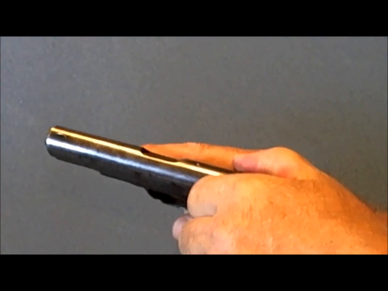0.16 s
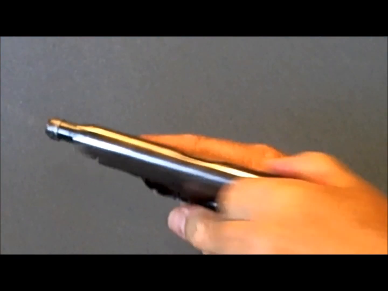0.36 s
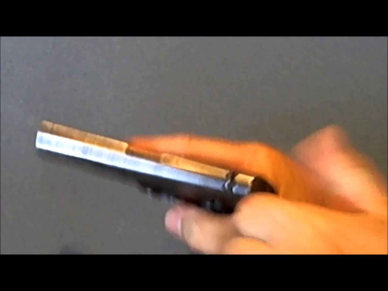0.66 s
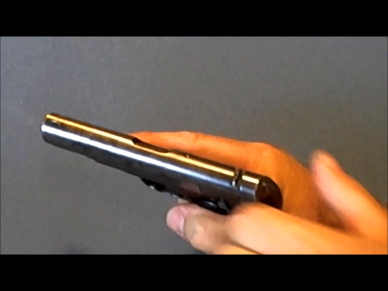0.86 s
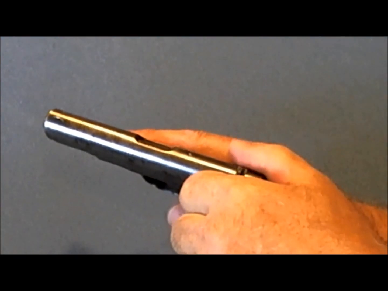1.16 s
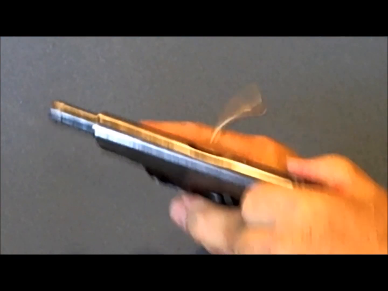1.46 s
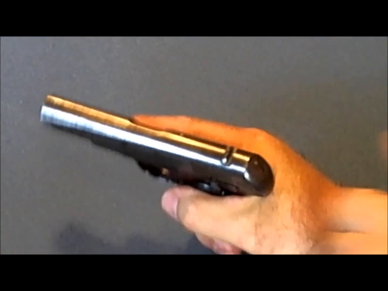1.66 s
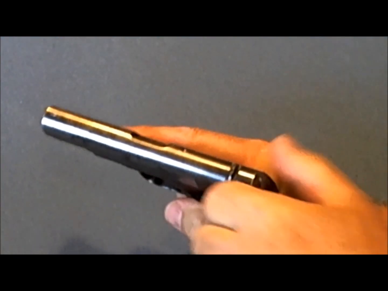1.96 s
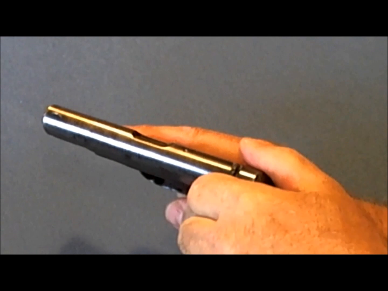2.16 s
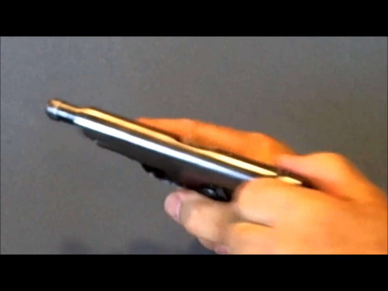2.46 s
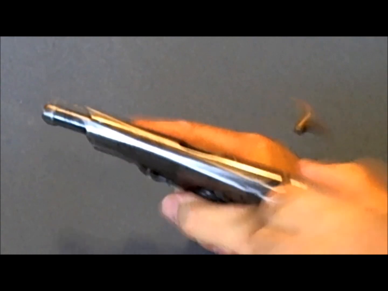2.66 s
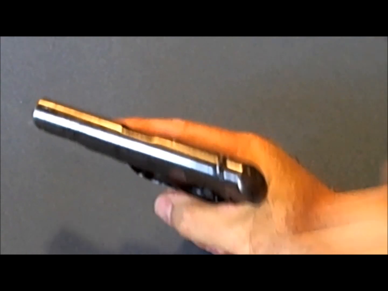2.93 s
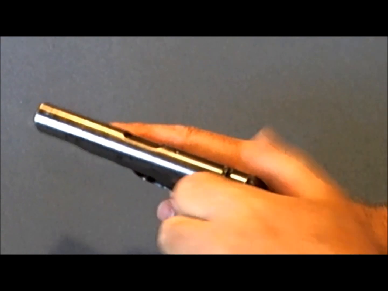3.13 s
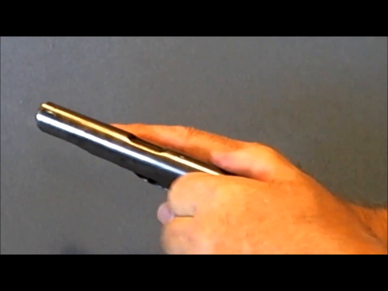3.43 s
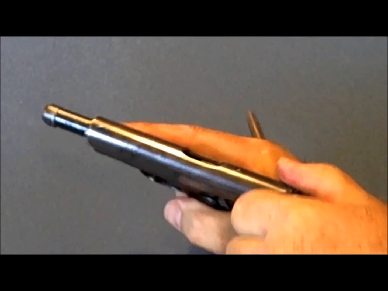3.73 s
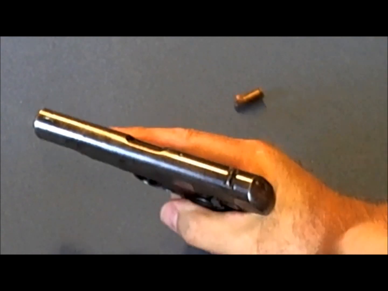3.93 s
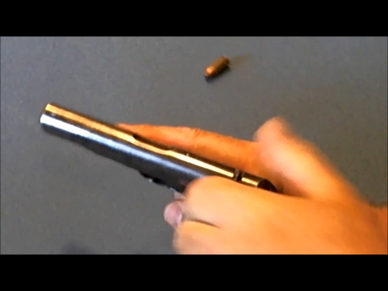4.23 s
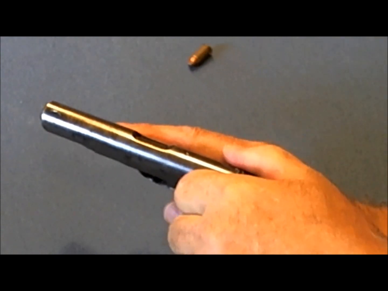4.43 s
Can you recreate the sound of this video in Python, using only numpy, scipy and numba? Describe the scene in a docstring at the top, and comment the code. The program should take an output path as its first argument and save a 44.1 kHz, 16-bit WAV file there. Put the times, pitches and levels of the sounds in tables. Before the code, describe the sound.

Very close to the microphone in a small, hard room, a pistol slide is racked four times about a second apart. Each time it scrapes and clicks backward, clacks on its stop with a thin spring ping, then runs forward and slams shut with a loud, bright steel crack and rattle. Dull cartridge knocks on the table follow the second and third cycles. Low rumble and faint hum lie underneath.

```python
"""A pistol slide is racked four times over a table in a small, hard room, close to a microphone.
First the action ticks as the grip tightens. In each racking the slide scrapes back as rail friction noise, clacks on
its stop and throws out a cartridge, while the spring pings; it then runs forward and shuts with a cluster of blows.
Impacts are noise bursts with decaying steel modes. Cartridges knock on the table after the second and third rackings.
Diffuse echoes prolong every blow, gain control slowly eases the level down, and rumble and hum persist throughout."""
import sys
import numpy as np
from scipy import signal
from scipy.fft import rfft, irfft, next_fast_len
from scipy.io import wavfile
from scipy.ndimage import uniform_filter1d
from numba import njit

SR = 44100
rng = np.random.default_rng(int(sys.argv[2]) if len(sys.argv) > 2 else 0)


def wav_out(sig):
    """Save sig, one row per channel (or a flat mono array), as 16-bit PCM at SR to the path in sys.argv[1]."""
    wavfile.write(sys.argv[1], SR, np.round(np.clip(np.atleast_2d(sig).T, -1, 1) * 32767).astype(np.int16))


N = 202419
TIME = np.arange(N) / SR


# Forward strokes of the slide; levels are relative: (release time [s], full-speed rub level [dB],
# feed time [s], feed level [dB], slam time [s], slam level [dB], rattle time [s], rattle level [dB])
RETURNS = [(1.229, -23.5, 1.308, -11, 1.285, 1.5, 1.318, 1.5),
           (2.245, -22, 2.2763, -6.5, 2.290, 5, 2.326, 2.5), (3.313, -22, 3.348, -8, 3.362, 0, 3.406, 0.5),
           (4.476, -26.5, 4.5128, -8.5, 4.534, 1.5, 4.568, -3)]
# Jolts of the gun in the hands as it shuts: (time [s], relative knock level [dB],
# relative push pressure [1], relative sway pressure [1], sway frequency [Hz])
JOLTS = [(1.288, -8, 0.19, .11, 6.5), (2.299, -7, 0.036, 0.052, 8.2), (3.372, -3.5, 0.24, 0.13, 4.67),
         (4.540, -11, -0.084, 0.098, 8.8)]
SPEED_POWER = 1.35  # growth of the rub with the time since release


def run_home(feed_weight_db=1.5, slam_weight_db=-3.0, rattle_weight_db=-11, knock_weight_db=9):
    """Friction, then impact: the slide runs forward and shuts with feed, slam, knock and rattle close together."""
    effort = np.zeros(N)
    feeds, slams, rattles = [], [], []
    for release_s, rub_db, feed_s, feed_db, slam_s, slam_db, rattle_s, rattle_db in RETURNS:
        speed = np.clip((TIME - release_s) / (slam_s - release_s), 0, 1) * (TIME < slam_s)
        effort += undb(rub_db) * speed ** SPEED_POWER
        feeds.append((feed_s, feed_db, feed_weight_db))
        slams.append((slam_s, slam_db, slam_weight_db))
        rattles.append((rattle_s, rattle_db, rattle_weight_db))
    knocks = [(s, db, knock_weight_db) for s, db, *_ in JOLTS]
    rub = undb(-1.0) * scrape(effort, grain_db=3.0, judder_db=0.2, hiss_db=-1.9, hiss_from_db=-52.0)
    feed_and_slam = shut_blows(feeds, t60=0.035) + shut_blows(slams, t60=0.049)
    knock_and_rattle = shut_blows(knocks, t60=0.011) + shut_blows(rattles, t60=0.083)
    return rub + feed_and_slam + knock_and_rattle


# Spectrum of blows on the closed gun: (frequency [Hz], relative level [dB])
SHUT_COLOUR = [(70, -15.5), (190, -3.5), (460, -5.5), (1150, -7), (2000, -6.5), (4000, -5.5), (5150, 0),
               (6400, -4), (7200, -3.5), (9500, -3.5), (9900, -15.5), (11800, -16.5), (12400, -12.5),
               (15000, -21)]
# Steel modes of the closed gun: (frequency [Hz], relative level [dB], t60 before hand damping [s])
SHUT_MODES = [(1400, -12.5, 0.12), (1734, -11.5, 0.54), (2650, -9, 0.13), (3050, -1.5, 0.11),
              (4650, -9, 0.12), (4600, -6, 0.19), (4930, -11, 0.24), (5025, 0, 0.12), (5440, -5.5, 0.26),
              (5230, -4.5, 0.29), (5400, 0, 0.24), (5260, -11, 0.82), (5530, -6.5, 0.58),
              (6200, -2.5, 0.14), (7130, 2, 0.23), (7170, 4, .25), (7650, 2.5, 0.34), (7100, -3, 0.18),
              (7800, -9.5, 0.17), (9500, -6, .08), (9650, -0.5, .1)]


def shut_blows(events, t60):
    """Modal excitation: a blow on the closed gun rings its modes."""
    struck = blows(events, SHUT_COLOUR, SHUT_MODES, weight_hz=1210, t60=t60, ring_db=-7.5, detune=0.0012)
    return undb(10) * struck


# Backward strokes of the slide; levels are relative: (pull start time [s], rear stop time [s],
# slow rub level [dB], full-speed rub level [dB], stop blow level [dB], ejection time [s], ejection level [dB])
DRAWS = [(0.921, 1.0753, -50.5, -33, -6.5, 1.093, -6), (1.933, 2.1407, -48, -28, -4, 2.173, -16),
         (3.022, 3.194, -49.5, -31.5, -10.5, 3.216, -14.5), (4.10, 4.283, -46, -28, -9.5, 4.2995, -8.5)]
# Small steel parts and cartridge rims that catch and click:
# (time [s], relative level [dB], low-end weight [dB])
CATCHES = [(.840, -49, 25.5), (.9372, -26.5, -6), (.967, -30.5, 6.5), (1.0152, -23.5, 4.5),
           (1.2386, -19.5, -4.5), (1.9715, -24, 8), (2.055, -30, -9.5), (2.0953, -23, 6.5), (3.049, -29, 2),
           (3.0695, -28.5, -9), (3.0925, -27, -3), (3.1485, -25, 6), (3.508, -20, 0), (4.1272, -28.5, 14),
           (4.193, -28, -3), (4.230, -17.5, -12), (4.2625, -17, 8)]
TAKE_UP_S = 0.02  # the hand takes up the load
RUSH_S, STALL_S = .022, 0.018  # time constants of speeding up towards the stop and of stalling on it
BOUNCE_S, BOUNCE_DB = .007, -6.5  # the cartridge glances off the port as it leaves


def draw_back(stop_weight_db=5.0, eject_weight_db=-11):
    """Friction, then impact: the slide creeps against its spring, rushes to its stop and ejects a cartridge."""
    effort = np.zeros(N)
    stops, ejections = [], []
    for pull_s, stop_s, creep_db, rush_db, stop_db, eject_s, eject_db in DRAWS:
        take_up = np.clip((TIME - pull_s) / TAKE_UP_S, 0, 1)
        speed = np.exp(np.minimum(TIME - stop_s, 0) / RUSH_S)
        stall = np.exp(-np.maximum(TIME - stop_s, 0) / STALL_S)
        effort += take_up * (undb(creep_db) + undb(rush_db) * speed) * stall
        stops.append((stop_s, stop_db, stop_weight_db))
        ejections.append((eject_s, eject_db, eject_weight_db))
        ejections.append((eject_s + BOUNCE_S, eject_db + BOUNCE_DB, eject_weight_db))
    rub = undb(-3.0) * scrape(effort, grain_db=2.5, judder_db=2.0, hiss_db=1.5, hiss_from_db=-39.5)
    clicks = open_blows(CATCHES, t60=.014) + undb(10.5) * small_catches()
    return rub + clicks + open_blows(stops, t60=0.031) + open_blows(ejections, t60=.012)


# Spectrum of blows on the open gun: (frequency [Hz], relative level [dB])
OPEN_COLOUR = [(90, -27), (200, -17.5), (700, -14.5), (920, -6.5), (1180, -13.5), (1620, -8), (1950, -13),
               (3000, -5), (3400, -4.5), (5200, -3), (6300, -5.5), (9000, -7.5), (10200, -17), (15000, -28)]
# Steel modes of the open gun: (frequency [Hz], relative level [dB], t60 before hand damping [s])
OPEN_MODES = [(915, -10.5, 0.11), (1600, -7.5, 0.23), (2983, 5, 0.058), (3970, -8, .04), (5000, -6, .05),
              (5480, -2, 0.079), (6820, 1.5, 0.11), (7230, 1, .08), (8770, -5, 0.038)]


def open_blows(events, t60):
    """Modal excitation: with the slide open the gun answers a blow with a different set of modes."""
    struck = blows(events, OPEN_COLOUR, OPEN_MODES, weight_hz=1400, t60=t60, ring_db=-14.5, detune=0.0019)
    return undb(11.0) * struck


TICKS_PER_S, TICK_DB, TICK_SCATTER_DB = 30, -34.5, 2  # mean rate, relative level and its deviation


def small_catches(count=8):
    """Stick-slip: faint ticks at loose intervals throughout each pull."""
    ticks = []
    for pull_s, stop_s, *_ in DRAWS:
        times = pull_s + (np.arange(count) + rng.random(count)) / TICKS_PER_S
        sizes = TICK_DB + TICK_SCATTER_DB * rng.standard_normal(count)
        ticks += [(s, db) for s, db in zip(times, sizes) if s < stop_s]
    return taps(ticks, OPEN_COLOUR, t60=0.01)


# Pings of the recoil spring: (time [s], relative level [dB])
PINGS = [(1.0563, -24), (1.122, -19.5), (2.158, -25), (3.114, -33), (4.264, -22.5), (4.309, -17.5)]
# Modes of the spring: (frequency [Hz], relative level [dB], t60 before hand damping [s])
PING_MODES = [(7110, -6, 0.037), (6950, -2.5, .04), (7090, 1.5, 0.066), (7740, -2, 0.039),
              (7300, -6.5, .025)]


def spring():
    """Free vibration: the recoil spring's coils slip on their guide and ping."""
    out = np.zeros(N)
    for s, db in PINGS:
        add(out, s, undb(db) * ring(PING_MODES, TIME[:SR // 4], detune=0.0067))
    return out


# Cartridges landing on the table: (time [s], relative level [dB], relative level of the first hop [dB])
KNOCKS = [(2.385, -21, -39), (2.533, -26, -37), (3.565, -29.5, -46.5)]
# Spectrum of a knock on the table: (frequency [Hz], relative level [dB])
TABLE_COLOUR = [(80, -12.5), (250, -1), (450, -1), (650, -5), (900, -6.5), (2000, -28), (8000, -40)]
HOP_S, HOP_SHRINK, HOP_LOSS_DB = 0.042, .8, -2.5  # first interval, then each hop is shorter and softer


def cartridges(count=3):
    """Inelastic rebound: a cartridge lands with a dull knock and loses energy at each hop."""
    hits = []
    for s, db, hop_db in KNOCKS:
        hits.append((s, db))
        for k in range(count):
            s = s + HOP_S * HOP_SHRINK ** k
            hits.append((s, hop_db + k * HOP_LOSS_DB))
    return taps(hits, TABLE_COLOUR, t60=0.031)


# Tiny ticks as the hand settles on the slide: (time [s], relative level [dB])
GRIP_TICKS = [(.4645, -48.5), (.4812, -46.5), (.492, -53)]
# Spectrum of a grip tick: (frequency [Hz], relative level [dB])
GRIP_COLOUR = [(500, -23), (3000, -16), (4300, -4), (6200, 1), (7600, -9), (9500, -8.5), (11000, -22),
               (15000, -26)]


def grip_ticks():
    """Damped contact: the action ticks, without ringing, as the grip tightens."""
    return undb(17.0) * taps(GRIP_TICKS, GRIP_COLOUR, t60=0.0077)


PUSH_S = .004  # time to the peak of the push
SWAY_LAG_S, SWAY_DECAY_S = 0.013, 0.071  # the sway starts later and decays with this time constant


def thumps(corner_hz):
    """Damped oscillation: each jolt is a short push of pressure, then the hands sway back and settle."""
    out, t = np.zeros(N), TIME[:SR // 2]
    for s, _, push, sway, sway_hz in JOLTS:
        add(out, s, push * (t / PUSH_S * np.exp(1 - t / PUSH_S)) ** 2)
        add(out, s + SWAY_LAG_S, -sway * np.sin(2 * np.pi * sway_hz * t) * np.exp(-t / SWAY_DECAY_S))
    return signal.sosfilt(signal.butter(1, corner_hz, "high", fs=SR, output="sos"), out)


# Spectrum of the rubbing rails: (frequency [Hz], relative level [dB])
RAIL_COLOUR = [(200, -13.5), (900, -5.5), (2000, -4.5), (3200, -3), (6000, -1.5), (7200, -2.5), (9000, -6),
               (11000, -11.5), (15000, -21)]
# Spectrum of the hiss of a fast stroke: (frequency [Hz], relative level [dB])
HISS_COLOUR = [(200, -46.5), (6000, -16), (9500, -2.5), (11500, 1.5), (13000, -1), (15000, -3)]


def scrape(effort, grain_db, judder_db, hiss_db, hiss_from_db, judder_s=0.0036):
    """Friction noise: dense catches of uneven size come in fits; a fast stroke is louder and adds a hiss."""
    effort = uniform_filter1d(effort, size=256)
    wander = np.interp(TIME / judder_s, np.arange(N), rng.standard_normal(N))
    judder = undb(judder_db * wander)
    present = rng.random(N) < .15
    sizes = undb(grain_db * np.minimum(rng.exponential(size=N), 4))
    catches = judder * rng.standard_normal(N) * present * sizes
    fast = effort ** 2 / (effort ** 2 + undb(hiss_from_db) ** 2)
    hiss = level(colour(judder * rng.standard_normal(N), HISS_COLOUR), hiss_db)
    return effort * (level(colour(catches, RAIL_COLOUR), 0) + fast * hiss)


def blows(events, spectrum, modes, weight_hz, t60, ring_db, detune):
    """Impact of steel on steel: a broad crack, its bass weighted by the frame's share, and the modal ring."""
    out, t = np.zeros(N), TIME[:SR // 2]
    for s, db, weight_db in events:
        crack = colour(chatter(t, t60), spectrum)
        bass = signal.sosfilt(signal.butter(1, weight_hz, fs=SR, output="sos"), crack)
        weighted = crack + (undb(weight_db) - 1) * bass
        add(out, s, undb(db) * (weighted + undb(ring_db) * ring(modes, t, detune)))
    return out


def taps(events, spectrum, t60):
    """Overdamped impact: short contacts on something too damped to ring."""
    out = np.zeros(N)
    for s, db in events:
        add(out, s, undb(db) * unit(colour(chatter(TIME[:SR // 4], t60), spectrum)))
    return out


HAND_T60_S = .7  # extra decay that the hand lays over every mode


def ring(modes, t, detune):
    """Modal superposition: the hand damps the steel modes and shifts them a little from blow to blow."""
    hz, db, t60 = np.transpose(modes)[:, :, None]
    shift, phase = rng.standard_normal((2, len(hz), 1))
    tones = np.sin(2 * np.pi * (hz * (1 + detune * shift) * t + phase))
    partials = undb(db) * fade(t, t60) * tones
    return unit(np.sum(partials, axis=0) * fade(t, HAND_T60_S))


SWELL = 3.5  # rise time constant over squared t60 [1/s]


def chatter(t, t60):
    """Micro-impacts: a short contact is a burst that starts at once; a long rattle takes a while to build up."""
    rise_s = SWELL * t60 ** 2
    return unit(rng.standard_normal(len(t)) * fade(t, t60) * (1 - np.exp(-t / rise_s)))


# Reverberation time of the room: (frequency [Hz], t60 [s])
ROOM_T60 = [(100, 0.27), (400, 0.39), (1500, 0.35), (5000, 0.38), (9000, 0.36), (15000, 0.34)]


def room(x, build_s, count=24):
    """Diffuse reverberation: each band has its own decay; the pattern changes in steps as the gun moves."""
    size = next_fast_len(SR * 2 // 3)
    t, hz = TIME[:size], np.arange(size // 2 + 1) * SR / size
    edges = np.append(0, np.geomspace(250, SR / 2, 8))
    bands = np.array([(hz >= lo) & (hz < hi) for lo, hi in zip(edges, edges[1:])])
    t60 = along(ROOM_T60, (edges[1:] + edges[:-1]) / 2)[:, None]
    decays = fade(t, t60) * (1 - np.exp(-t / build_s))
    out = np.zeros(N)
    for part in np.array_split(np.arange(N), count):
        noise = irfft(bands * rfft(rng.standard_normal(size)), size)
        tail = np.sum(noise * decays, axis=0)
        add(out, TIME[part[0]], signal.fftconvolve(x[part], unit(tail)))
    return out


# Spectrum of the room's rumble: (frequency [Hz], relative level [dB])
FLOOR_COLOUR = [(20, -2.5), (60, -8.5), (110, -15.5), (170, -20.5), (260, -25.5), (380, -31), (470, -22),
                (600, -29), (900, -31), (1550, -34.5), (3000, -42), (5200, -45.5), (8200, -47.5),
                (15000, -53)]
# Mains hum: (frequency [Hz], relative level [dB])
HUM = [(59.5, -69), (122.5, -58)]
FLOOR_DB = -53.5  # rms level of the rumble ahead of the gain control


def background():
    """Stationary noise and steady tones: low room rumble with a mains hum."""
    hum = np.zeros(N)
    for hz, db in HUM:
        hum += undb(db) * np.sqrt(2) * np.sin(2 * np.pi * (hz * TIME + rng.random()))
    rumble = level(colour(rng.standard_normal(N), FLOOR_COLOUR), FLOOR_DB)
    return rumble + undb(-4) * hum


def undb(db):
    """Logarithmic level: decibels to amplitude gain."""
    return 10 ** (np.asarray(db) / 20)


def unit(x):
    """Energy normalisation: scale to an energy of one."""
    return x / np.sqrt(np.sum(x ** 2))


def level(x, db):
    """Power normalisation: scale to an rms level."""
    return unit(x) * np.sqrt(len(x)) * undb(db)


def fade(t, t60):
    """Exponential decay, 60 dB down at t60."""
    return np.exp(-np.log(1000) * t / t60)


def add(out, s, x):
    """Superposition: mix x into out from time s on."""
    i = int(s * SR)
    out[i:i + len(x)] += x[:N - i]


def along(points, hz):
    """Logarithmic pitch scale: read a table over log frequency."""
    f, value = np.transpose(points)
    return np.interp(np.log(hz + 1), np.log(f), value)


def colour(x, points, size=4096):
    """Minimum phase: the folded cepstrum of a spectrum gives a causal filter."""
    log_gain = along(points, np.arange(size // 2 + 1) * SR / size) * np.log(10) / 20
    cepstrum = irfft(log_gain)
    cepstrum[1:size // 2] *= 2
    cepstrum[size // 2 + 1:] = 0
    response = unit(irfft(np.exp(rfft(cepstrum))))
    return signal.fftconvolve(x, response)[:len(x)]


def scene():
    """Superposition of direct sound, echoes and background: gun and cartridges in the room."""
    closing = run_home()
    drawing = draw_back() + undb(16) * spring()
    knocks = undb(10) * cartridges()
    grip = grip_ticks()
    sent = undb(-4.5) * drawing + undb(-1.0) * (closing + knocks) + undb(-9.0) * grip
    echoes = room(sent, build_s=.006)
    return (drawing + closing + knocks + grip + echoes + background())[None]


@njit
def follow(x, attack, release):
    """Leaky integration: an envelope of the rectified signal with separate rise and fall rates."""
    out, e = np.empty(len(x)), 0.
    for i in range(len(x)):
        a = abs(x[i])
        e += (a - e) * (attack if a > e else release)
        out[i] = e
    return out


def record(dry):
    """Dynamic compression: the gain eases down slowly; peaks are rounded and the top is cut."""
    attack_s, release_s = 0.73, 0.35  # time constants of the detector
    ceiling_db, thump_drive_db, clip_db = -22, 13, -4.5
    low = thumps(corner_hz=1.5)
    # the detector weights the thumps more than the rest and slowly eases the level down
    envelope = follow(dry[0] + undb(thump_drive_db) * low, 1 / (attack_s * SR), 1 / (release_s * SR))
    held = dry / (1 + (envelope / undb(ceiling_db)) ** 4) ** (1 / 4)
    rounded = undb(clip_db) * np.tanh((held + low) / undb(clip_db))
    top_cut = signal.ellip(8, .2, 70, 14900, fs=SR, output="sos")  # ripple [dB], rejection [dB], edge [Hz]
    return signal.sosfilt(top_cut, rounded)


dry = scene()
out = record(dry)
wav_out(out)
```